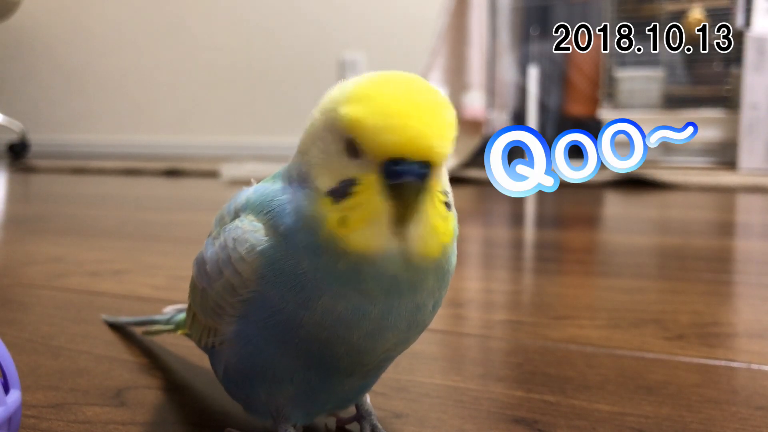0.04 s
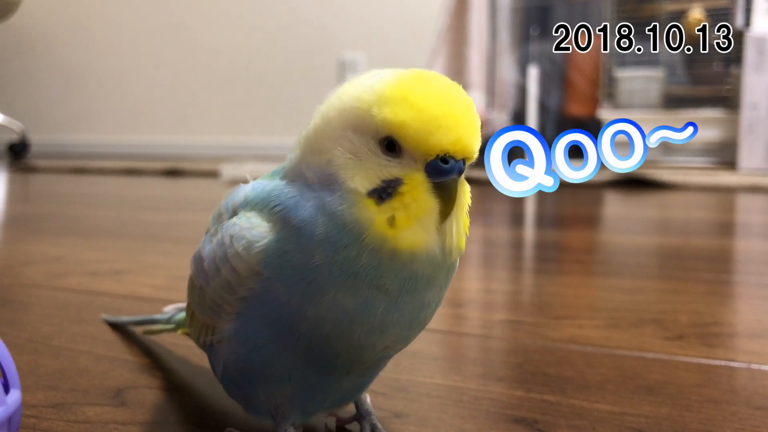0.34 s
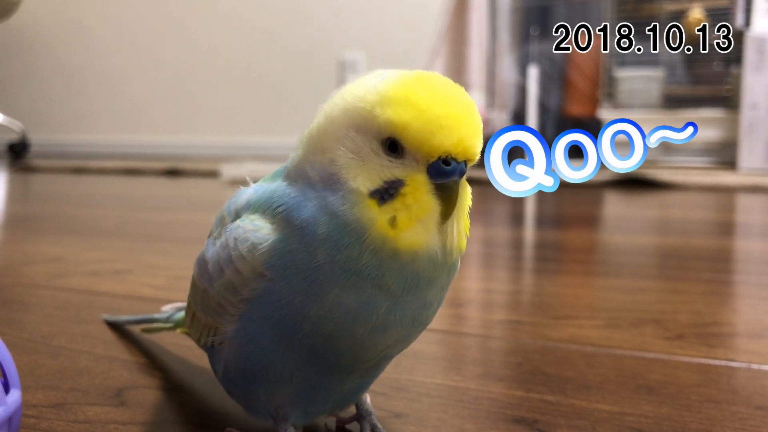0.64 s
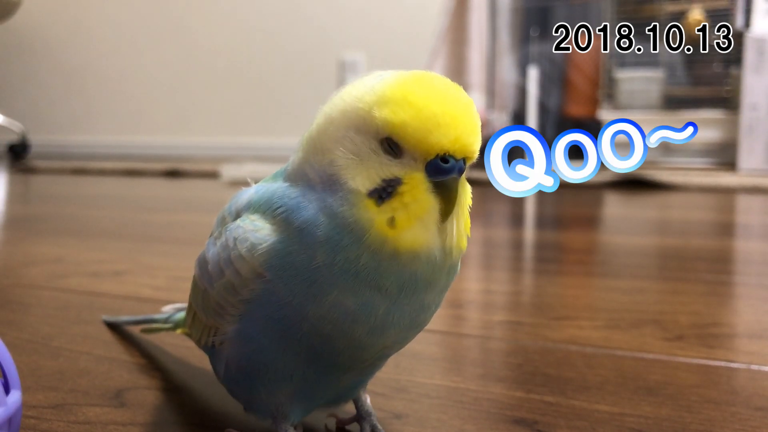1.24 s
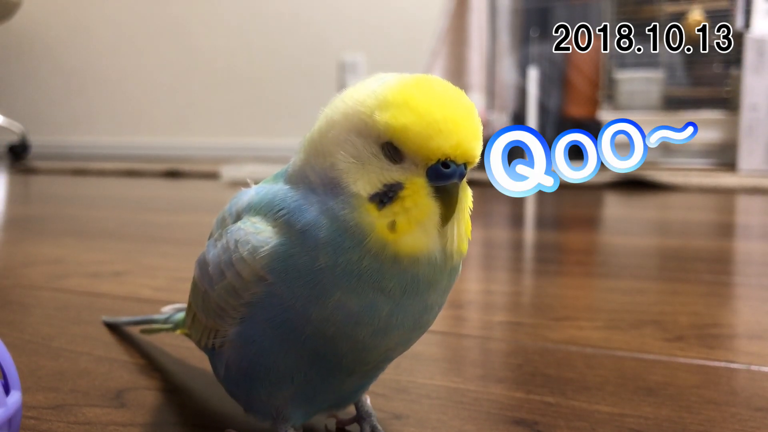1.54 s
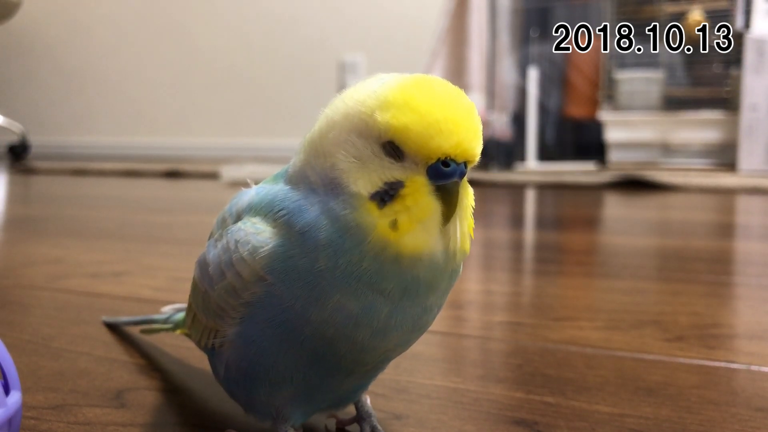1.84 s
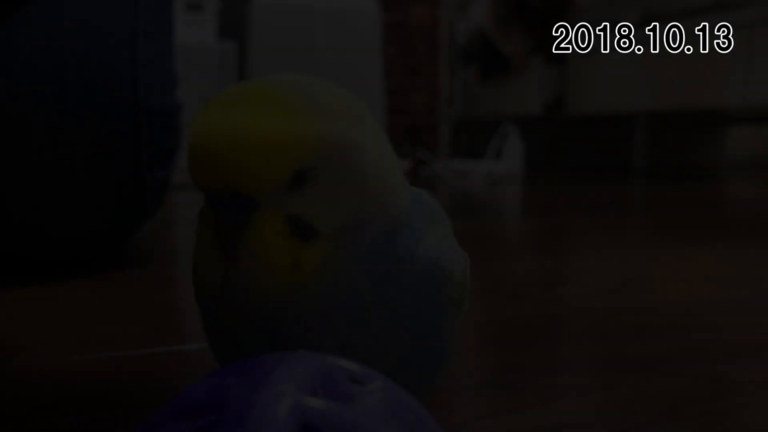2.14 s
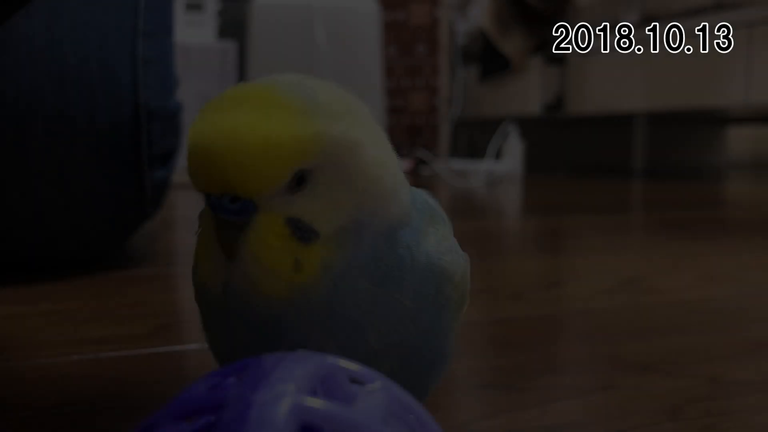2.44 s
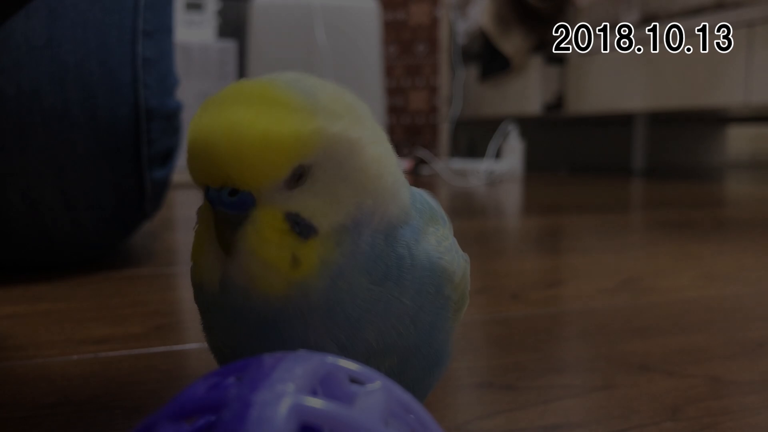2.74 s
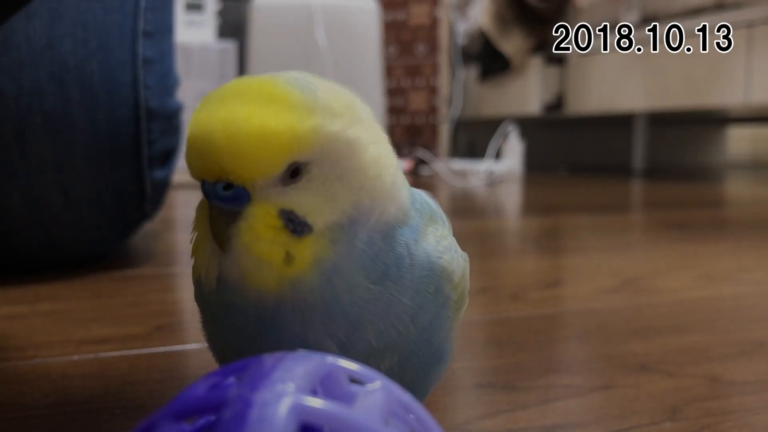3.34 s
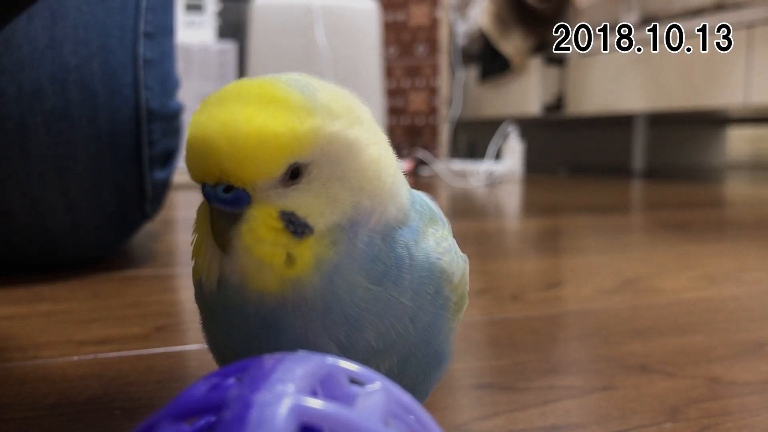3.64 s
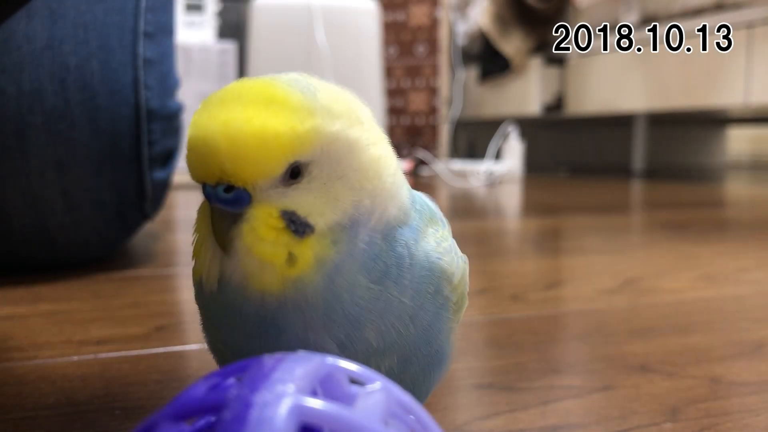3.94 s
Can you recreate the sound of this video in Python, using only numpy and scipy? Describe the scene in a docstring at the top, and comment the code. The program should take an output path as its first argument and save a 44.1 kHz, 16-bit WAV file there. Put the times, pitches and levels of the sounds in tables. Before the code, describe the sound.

A small pet bird calls once with a wavering whine, then makes three bouts of tiny scratchy clicks and creaks with its beak. It is heard up close in a quiet room with a faint appliance hum.

```python
"""A budgie, close to the microphone on a wooden floor in a quiet room, gives one long whine and a cluck.
Then it grinds its beak in short bouts: the mandibles scrape in tiny slips, creak and snap over each
other's ridges, ringing the hollow beak and its hard edge. Low room rumble, appliance hum and a soft hiss
lie underneath, with a faint rustle near the end. The sound drops out once for an instant."""
import sys
import numpy as np
from scipy import signal
from scipy.fft import rfft, irfft
from scipy.io import wavfile
from scipy.ndimage import uniform_filter1d

SR = 44100
rng = np.random.default_rng(int(sys.argv[2]) if len(sys.argv) > 2 else 0)


def unload_audio(sound):
    """Save the sound as a 16-bit wav file, at the path given as the first command line argument."""
    columns = np.transpose(np.atleast_2d(sound))
    # keep every value between -1 and 1, then stretch to whole-number steps
    steps = np.round(np.clip(columns, -1, 1) * 32767)
    wavfile.write(sys.argv[1], SR, steps.astype(np.int16))


N = 176400
T = np.arange(N) / SR
RING_S, STROKE_FADE_S = .012, .0022

# Modes of the hollow beak and of its hard edge (frequency [Hz], relative level [dB], t60 [s])
BODY_MODES = [(926, -7, 0.0015), (1333, 2, 0.0061), (2043, 1, 0.0023), (2210, 1.5, 0.0056),
              (3130, -6, 0.0064), (3960, -4.5, 0.0032)]
EDGE_MODES = [(4220, -1.5, 0.0011), (5910, -0.5, 0.0035), (6830, -2, 0.0022), (7500, -5.5, 0.0012),
              (9200, 3.5, 0.0013), (12300, -3.5, 0.0035), (14400, -3.5, 0.0026)]


def call():
    """The budgie's nasal whine: a strong fundamental, pressed overtones and rasp in a high formant."""
    # Course of the call (time [s], pitch [Hz], then relative levels:
    # fundamental [dB], overtones [dB], throat formant [dB], top hiss [dB])
    contour = [(0.0, 929, -37, -42, -33.5, -51), (0.042, 868, -38, -33.5, -38.5, -48.5),
               (0.078, 948, -35, -43, -36.5, -49), (0.122, 974, -31.5, -45, -43, -58),
               (0.15, 938, -35, -45.5, -42, -61), (0.164, 1014, -34.5, -50, -46, -70),
               (0.187, 1029, -35, -53, -46.5, -76), (0.21, 1057, -30.5, -53, -44, -82),
               (0.232, 1041, -31, -51.5, -44, -79), (0.255, 1039, -28.5, -48.5, -45, -68),
               (0.302, 1016, -32, -47, -46, -64), (0.318, 1002, -31.5, -49, -42, -63),
               (0.328, 967, -31, -47.5, -46, -59), (0.347, 993, -32.5, -44.5, -45, -60),
               (0.357, 1036, -31.5, -46, -45, -73), (0.38, 1021, -32, -59, -42.5, -78),
               (0.408, 1065, -32, -51.5, -41.5, -80), (0.431, 1145, -31.5, -51.5, -39.5, -70),
               (0.45, 1100, -34, -48, -43, -76), (0.457, 1135, -33.5, -66, -51, -82),
               (0.476, 1030, -42, -65, -80, -88)]
    # Roughness of the voice (time [s], roughness [0-1])
    roughness = [(0, .45), (.045, .5), (.1, .35), (.15, .45), (.17, .16), (.225, .2), (.25, .45),
                 (.315, .4), (.333, .75), (.358, .2)]
    # A second, slower oscillation in the syrinx (time [s], depth [0-1])
    flutter_depth = [(.228, 0), (.24, .85), (.29, .8), (.315, .2), (.333, .8), (.35, 0)]
    # Spectra of the overtones, throat formant and top hiss (frequency [Hz], relative level [dB])
    overtone_shape = [(1900, 3.5), (2650, -9.5), (3100, -17.5), (3900, -18), (4700, -19), (6200, -20),
                      (7300, -11), (8400, -17.5), (9500, -22), (11000, -35)]
    throat_shape = [(3000, -18.5), (4100, -17.5), (4700, 1), (5400, 4.5), (6300, 3), (7200, -27),
                    (8500, -56), (10500, -34), (15000, -47)]
    hiss_shape = [(8000, 1), (10500, -16), (12300, 4), (13800, -8), (15500, -19)]
    breath_shape = [(900, 3.5), (3500, -13), (6500, 6.5), (8800, -.5), (10500, -24)]
    flutter_hz, flutter_turns, throb_depth = 292, .018, .7

    t = T[T < .5]
    hz, fundamental_db, overtone_db, formant_db, hiss_db = curves(contour, t)
    rasp, depth = curves(roughness, t)[0], curves(flutter_depth, t)[0]
    flutter_rate = flutter_hz * (1 + .048 * wander(t, rate_hz=49))
    flutter = depth * np.sin(2 * np.pi * np.cumsum(flutter_rate) / SR)
    jitter = .0089 * (.49 + 2 * rasp) * wander(t, rate_hz=590)
    quaver = .005 * wander(t, rate_hz=34)
    turns = np.cumsum(hz * (1 + jitter + quaver)) / SR + flutter_turns * flutter

    k = np.arange(2, 14)[:, None]  # harmonic numbers
    waver = amp(2.5 * (1.5 - 2 / k) * np.array([wander(t, rate_hz=33) for _ in k]))
    partials = np.sqrt(2) * waver * np.cos(2 * np.pi * (k * turns + rng.random(k.shape)))
    overtones = (partials * read(overtone_shape, k * hz)).sum(0)
    throat_gain = read(throat_shape, k * hz)
    formant = (partials * throat_gain).sum(0) / np.sqrt((throat_gain ** 2).sum(0))
    puffs = rng.standard_normal((3, len(t))) * (1 + .69 * np.cos(2 * np.pi * turns))  # one per cycle
    throat = np.sqrt(1 - rasp ** 2) * formant + rasp * colour(puffs[1], throat_shape)

    voice = amp(fundamental_db) * np.sqrt(2) * np.sin(2 * np.pi * turns)
    voice += amp(overtone_db) * (overtones + rasp * colour(puffs[0], breath_shape))
    voice += amp(formant_db - 3) * (1 + throb_depth * flutter) * throat
    voice += amp(hiss_db) * colour(puffs[2], hiss_shape)
    return voice * np.clip((contour[-1][0] - t) / .012, 0, 1)


def cluck():
    """A soft falling note with a little puff of noise; returns its start time and sound."""
    # Course of the cluck (time [s], pitch [Hz], level [dB])
    contour = [(0.489, 676, -83), (.499, 656, -46), (0.513, 593, -45), (0.52, 469, -40), (0.534, 364, -88)]
    t = np.arange(contour[0][0], contour[-1][0], 1 / SR)
    hz, db = curves(contour, t)
    phase = 2 * np.pi * np.cumsum(hz) / SR
    note = np.sqrt(2) * (np.sin(phase) + amp(-15) * np.sin(2 * phase))
    puff = colour(rng.standard_normal(N), [(400, -2), (1100, 13), (1600, -2), (3000, -16)])[:len(t)]
    return t[0], amp(db) * (note + amp(-9.5) * puff)


def snaps():
    """The mandible jumps off a ridge, chatters, rebounds once and rings the beak."""
    # Snaps, levels relative (time [s], body [dB], body tilt [dB/octave], edge [dB], edge tilt [dB/octave])
    jumps = [(0.877, -42, 32, -47, -9), (0.9167, -51, -1, -42.5, -17), (0.94, -38, 14, -35, -5),
             (0.9707, -36, 8, -32.5, -2), (0.9735, -45, 6, -40, -4), (0.9975, -42, 6, -48, -30),
             (1.005, -38, 10, -44, 4), (1.0167, -43, 7.5, -44, 0), (1.0234, -52, 6, -37, -5),
             (1.0335, -33, 1, -38, 9), (1.051, -40.5, 1, -39, 7), (1.1198, -44, -27, -39, 6),
             (1.766, -41, -26, -44, 1), (1.8208, -47.5, -11, -48, -7), (1.824, -39, 11, -37.5, -19),
             (1.8381, -52, -3, -47, -7), (1.8766, -25.5, -2.5, -31, 0), (2.08, -47, 2, -36.5, 0),
             (2.1013, -42.5, -18, -56, 0), (2.1116, -32, 9.5, -35, -19), (2.9261, -39, -29, -50, -25),
             (2.95, -43, 17, -42, 0), (2.9852, -59, 15, -41.5, -31), (3.064, -46.5, 9, -52.5, -32),
             (3.083, -47, 5, -54, -8), (3.1028, -47, 1, -55, -14), (3.129, -50, -2, -43, -6),
             (3.1346, -43, -8, -39, 5), (3.1474, -23.5, 1, -23.5, 0.5), (3.1576, -48, 5, -36.5, -30),
             (3.162, -34, 2, -37, 29), (3.211, -45, -6, -48, 10), (3.2164, -38.5, -3, -38.5, -8),
             (3.2221, -40, -1, -44, -3), (3.2394, -46, -9, -46.5, 5)]
    snap_s, chatter_s, rebound_s = .0025, .0008, (.0005, .0013)
    out, t = np.zeros(N), np.arange(0, snap_s, 1 / SR)
    for start, body_db, body_tilt, edge_db, edge_tilt in jumps:
        chatter = rng.standard_normal(len(t)) * np.exp(-t / chatter_s)
        force = (t == 0) + amp(-19) * chatter / np.linalg.norm(chatter)
        force[np.searchsorted(t, rng.uniform(*rebound_s))] += amp(-12)
        beak = amp(body_db) * ring(BODY_MODES, body_tilt) + amp(edge_db) * ring(EDGE_MODES, edge_tilt)
        add(out, start, np.convolve(force, beak))
    return out * amp(-.5) * np.sqrt(snap_s * SR)


def lingering_rings():
    """The hardest snaps leave a few modes of the beak ringing longer."""
    # Lingering modes (time [s], frequency [Hz], level [dB])
    modes = [(1.8767, 2930, -19.5), (1.8769, 1800, -29), (3.14781, 2060, -23.5), (3.1478, 6500, -19),
             (3.1478, 15000, -29)]
    out, t = np.zeros(N), np.arange(0, RING_S, 1 / SR)
    for start, hz, db in modes:
        add(out, start, amp(db) * decay(t, t60=.008) * np.sin(2 * np.pi * hz * t))
    return signal.lfilter(*signal.butter(2, BODY_MODES[0][0], "high", fs=SR), out)


def scrapes():
    """Light strokes of the mandible ring the whole beak."""
    # Strokes, levels relative (time [s], length [s], body [dB], edge [dB])
    strokes = [(0.856, 0.014, -49, -49.5), (0.872, 0.0074, -47.5, -46), (0.882, 0.017, -48.5, -52.5),
               (0.903, 0.0089, -57, -53), (0.943, 0.015, -49.5, -51), (0.968, 0.023, -49, -62),
               (1.009, 0.0153, -41.5, -48), (1.107, 0.023, -55.5, -55), (1.813, 0.016, -50.5, -48.5),
               (1.874, 0.015, -45.5, -56), (2.052, 0.0164, -57.5, -58.5), (2.097, 0.0061, -41, -43),
               (2.924, 0.016, -51, -52.5), (2.94, 0.029, -46, -48), (2.976, 0.0118, -47, -45),
               (3.022, 0.028, -55, -59.5), (3.085, 0.058, -53.5, -61), (3.121, 0.014, -52, -50),
               (3.157, 0.006, -50, -45), (3.2, 0.033, -48, -50)]
    out = np.zeros(N)
    for start, length, body_db, edge_db in strokes:
        force = stroke(length)
        body = amp(body_db) * ring(BODY_MODES, tilt_db=.5)
        edge = amp(edge_db) * ring(EDGE_MODES, tilt_db=-3)
        add(out, start, np.convolve(force, body + edge))
    return out * amp(-2)


def creaks():
    """Pressed strokes sing in the hollow of the beak, whose resonances rise as the mandible slides."""
    # Strokes (time [s], length [s], nominal resonance [Hz], hollow level [dB], upper levels [dB])
    strokes = [(0.996, 0.0036, 1240, -46, -43), (1.003, 0.005, 1410, -37, -41.5),
               (3.117, 0.019, 1440, -48, -62), (3.163, 0.0016, 1680, -37, -52)]
    rise, bandwidth = .11, .32  # shares of each resonance's frequency
    out = np.zeros(N)
    for start, length, hz, hollow_db, upper_db in strokes:
        force = np.pad(stroke(length), (0, round(RING_S * SR)))
        glide = 1 + rise * (np.minimum(T[:len(force)] / length, 1) - .5)
        for ratio, db in [(.98, hollow_db), (2.45, upper_db), (3.6, upper_db)]:
            centre, width = ratio * hz * glide, ratio * hz * bandwidth
            creak = resonate(resonate(force, centre, width), centre, width)
            add(out, start - STROKE_FADE_S, amp(db) * np.sqrt(length * SR) * creak / np.linalg.norm(creak))
    return out


def stroke(length):
    """Force of one stroke: a quick run of uneven slips over a fine rub."""
    slips_per_s, draws = 2200, 8192
    t = np.arange(0, length + STROKE_FADE_S, 1 / SR)
    slipping = rng.random(draws)[:len(t)] < slips_per_s / SR
    slip_db = 4 * np.minimum(rng.exponential(1, draws)[:len(t)], 3)
    rub = rng.standard_normal(draws)[:len(t)]
    fade = np.clip(np.minimum(t, t[-1] - t) / STROKE_FADE_S, 0, 1)
    return unit(slipping * amp(slip_db) * np.sign(rub) + amp(-30) * rub) * fade


def ring(modes, tilt_db):
    """The beak's response to one slip, energy 1; the contact point tilts, shifts and staggers the modes."""
    detune, scatter_db, stagger_s = .028, 1.2, .0003
    hz, db, t60 = np.transpose(modes)[:, :, None]
    shift, strength = rng.standard_normal((2, len(modes), 1))
    lag = stagger_s * np.linspace(1, 0, len(modes))[:, None]
    t = np.maximum(np.arange(0, RING_S, 1 / SR) - lag, 0)
    polarity = (-1) ** np.arange(len(modes))[:, None]
    gain = polarity * amp(db + scatter_db * strength + tilt_db * np.log2(hz))
    ringing = (gain * decay(t, t60) * np.sin(2 * np.pi * hz * (1 + detune * shift) * t)).sum(0)
    ringing = signal.lfilter(*signal.butter(2, .5 * modes[0][0], "high", fs=SR), ringing)
    return ringing / np.linalg.norm(ringing)


def near_reflections(clicks):
    """The floor and nearby things throw the clicks back to the microphone."""
    # Reflections (delay [s], gain [dB])
    echoes = [(.00115, -21), (.0019, -33)]
    out = clicks.copy()
    for delay, db in echoes:
        add(out, delay, amp(db) * clicks)
    return out


def room(direct):
    """The room adds a faint, dull tail behind the close sound."""
    t, dull_hz = T[:SR // 2], 4730
    tail = rng.standard_normal(len(t)) * decay(t, t60=.25) * np.minimum(t / .0016, 1)
    tail = signal.lfilter(*signal.butter(1, dull_hz, fs=SR), tail)
    return direct + amp(-23) * signal.fftconvolve(direct, tail / np.linalg.norm(tail))[:N]


def room_tone():
    """Steady rumble, hiss with a thin high whine, wavering hum and one faint low rustle."""
    # Spectra of the background noises (frequency [Hz], relative level [dB])
    rumble_shape = [(20, -51), (40, -21), (64, -6.5), (91, -4.5), (147, 3), (243, -11.5), (274, -10),
                    (348, -14), (497, -15.5), (700, -27), (910, -78)]
    hiss_shape = [(410, -12.5), (700, -0.5), (1160, -5), (1700, -7), (5710, -10.5), (8450, -12),
                  (9260, -11.5), (10100, -11.5), (15800, -18)]
    whine_shape = [(8750, -25), (9130, 1), (9400, -22), (9850, -31)]
    rustle_shape = [(35, -3), (80, 8.5), (450, 1), (2000, -22)]
    # Hum of household appliances (frequency [Hz], level [dB])
    hum_tones = [(120, -69), (148, -60), (277, -68)]
    # The rustle swells after the last bout (time [s], level [dB])
    rustle_swell = [(3.2, -61), (3.27, -59), (3.46, -55.5), (3.8, -71)]
    rumble = amp(-55) * colour(rng.standard_normal(N), rumble_shape)
    hiss = amp(-64) * colour(rng.standard_normal(N), hiss_shape)
    whine = amp(-77.5) * colour(rng.standard_normal(N), whine_shape)
    hum = sum(amp(db) * np.sqrt(2) * np.sin(2 * np.pi * hz * T + .39 * wander(T, rate_hz=1.6))
              for hz, db in hum_tones)
    rustle = amp(curves(rustle_swell, T)[0]) * colour(rng.standard_normal(N), rustle_shape)
    return rumble + hiss + whine + hum + rustle


def amp(db):
    """Decibels to gain."""
    return 10 ** (np.asarray(db) / 20)


def unit(x):
    """Scales to rms 1."""
    return x / np.sqrt(np.mean(x ** 2) + 1e-20)


def decay(t, t60):
    """An envelope that falls 60 dB in t60 seconds."""
    return np.exp(-np.log(1000) * t / t60)


def read(spectrum, hz):
    """Gain of a spectrum at hz, falling 60 dB an octave beyond its ends."""
    f, db = np.transpose(spectrum)
    octaves = np.log2(hz + 1)
    beyond = np.maximum(np.log2(f[0] + 1) - octaves, 0) + np.maximum(octaves - np.log2(f[-1]), 0)
    return amp(np.interp(octaves, np.log2(f + 1), db) - 60 * beyond)


def curves(table, t):
    """Every column of a time table at the times t."""
    times, *columns = np.transpose(table)
    return [np.interp(t, times, column) for column in columns]


def colour(x, spectrum):
    """Gives x a spectrum and rms 1."""
    return unit(irfft(rfft(x) * read(spectrum, np.fft.rfftfreq(len(x), 1 / SR)), len(x)))


def wander(t, rate_hz):
    """Smooth random drift of rms 1."""
    f = np.fft.rfftfreq(len(t), 1 / SR)
    return unit(irfft(rfft(rng.standard_normal(len(t))) / (1 + (f / rate_hz) ** 4), len(t)))


def resonate(x, hz, width_hz):
    """A resonance that follows the curve hz."""
    turn = np.exp(2j * np.pi * np.cumsum(hz) / SR)
    pole = np.exp(-np.pi * width_hz / SR)
    return (turn * signal.lfilter([1 - pole], [1, -pole], x / turn)).real


def add(mix, start_s, sound):
    """Mixes a sound in at start_s."""
    part = mix[max(round(start_s * SR), 0):][:len(sound)]
    part += sound[:len(part)]


def scene():
    """The bird close up, its room behind it, in mono."""
    bird = near_reflections(snaps() + lingering_rings() + scrapes() + creaks())
    add(bird, 0, call())
    add(bird, *cluck())
    return (room(bird) + room_tone())[None]


def record(dry):
    """The sound drops out for an instant, and the highest treble is cut."""
    drop_s, return_s, floor_db, cutoff_hz = 1.897, 1.926, -38, 16150
    live = uniform_filter1d(1. * ((T < drop_s) | (T > return_s)), size=160)
    lowpass = signal.firwin(401, cutoff_hz, window=("kaiser", 9), fs=SR)
    return signal.oaconvolve(dry * np.maximum(live, amp(floor_db)), lowpass[None], "same")


dry = scene()
out = record(dry)
unload_audio(out)
```